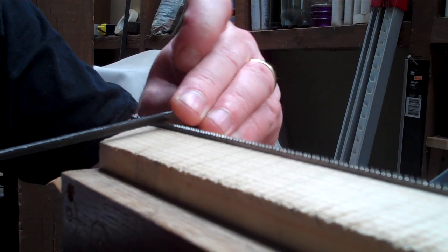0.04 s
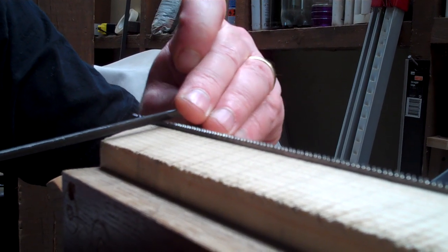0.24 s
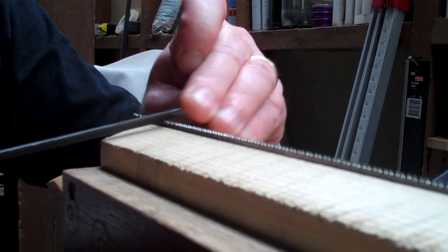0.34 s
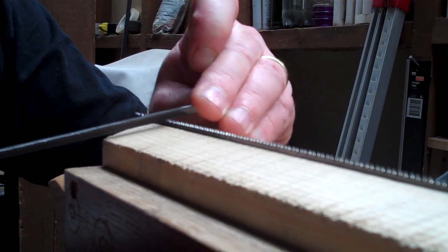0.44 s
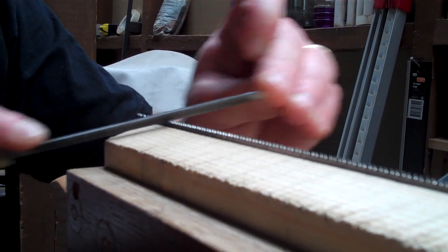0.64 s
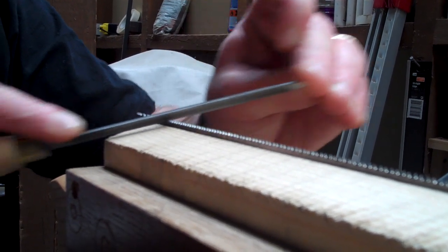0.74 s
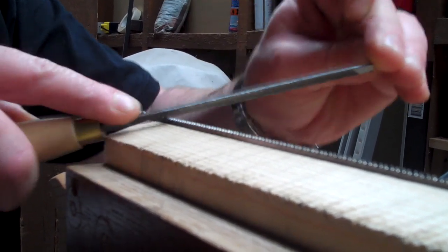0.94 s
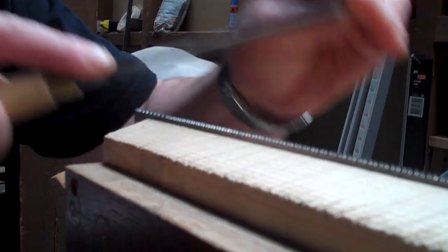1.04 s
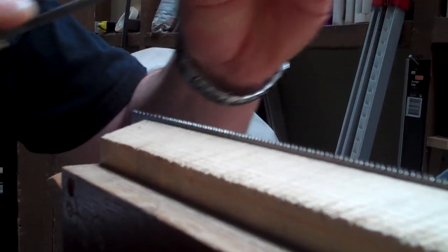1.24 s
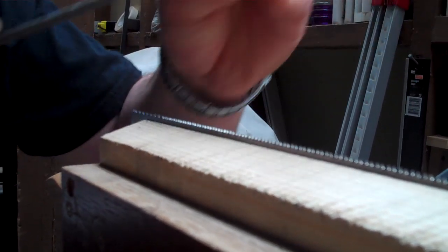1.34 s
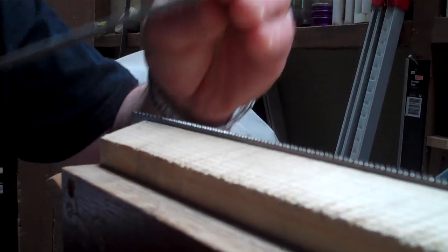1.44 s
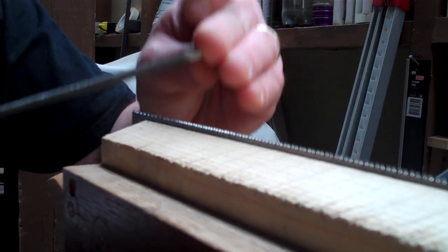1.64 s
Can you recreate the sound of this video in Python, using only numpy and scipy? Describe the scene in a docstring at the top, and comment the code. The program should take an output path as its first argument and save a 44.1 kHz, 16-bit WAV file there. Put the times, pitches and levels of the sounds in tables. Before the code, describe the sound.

Metal file scraping on a saw blade: light taps, two raspy pushes, a tick, then quiet

```python
"""A steel file rasps in a tooth gap of a handsaw clamped between boards, in a quiet workshop, microphone close by.
It taps down, makes a short and a long push, and is lifted off. Random catches over smooth noise make the rasp,
short blows the taps and snags; both drive resonances of boards, blade and file. The lifted file ticks,
the bench rumbles, the sleeve rustles as the arm draws back; the walls answer briefly over a steady hush."""
import sys
import numpy as np
from scipy import signal
from scipy.fft import rfft, irfft, next_fast_len
from scipy.io import wavfile
from scipy.ndimage import uniform_filter1d, map_coordinates

SR = 44100
rng = np.random.default_rng(int(sys.argv[2]) if len(sys.argv) > 2 else 0)


def inscribe(sig):
    """Save sig as 16-bit PCM at rate SR to the path in sys.argv[1].

    A 1-D sig is mono; a 2-D sig holds one channel per row.
    Samples are clipped to [-1, 1] before scaling.
    """
    pcm = np.round(np.clip(np.atleast_2d(sig).T, -1, 1) * 32767)
    wavfile.write(sys.argv[1], SR, pcm.astype(np.int16))


N = 74970

# The hush of the shop and the microphone. Each row: frequency in Hz, relative density in dB per Hz.
AIR_SPECTRUM = [(15, -13.5), (45, -3), (150, -9.5), (450, -13), (1500, -16), (4500, -16.5), (7000, -22),
                (10000, -28.5), (13000, -45.5), (14500, -69.5)]
# How alike left and right are in the hush. Each row: frequency in Hz, likeness (1 = same).
AIR_LIKENESS = [(60, 0.33), (240, 0.8), (950, 0.21), (3770, 0.069), (15000, 0.03)]
# The file is set down. Each row: start in seconds, relative levels in dB of the blow on the boards,
# the blade's low ring, its high ring and the treble, then rise in seconds, time to fall 20 dB in seconds.
TAPS = [(0.157, 2, -4.5, -10, -11.5, 0.0013, 0.0044), (.1625, -6.5, 1, -15, -13.5, 0.00062, 0.0042),
        (0.1662, -10, -15.5, -5, -9.5, 0.00036, 0.006), (0.179, 0.5, -22.5, -10.5, -17, 0.00044, 0.0059),
        (0.203, -3.5, -14, -9.5, -11.5, .0005, 0.006), (0.2071, -1, -0.5, -7, -11.5, 0.00029, 0.0016),
        (0.3251, 4.5, 11.5, 7.5, 0, .0014, 0.0033), (0.4235, 8, 0, -6, -2, .0006, .004),
        (0.429, 9, 9, -9.5, -15.5, .001, 0.0034)]
# The clamping boards. Each row: resonance in Hz, width in Hz, relative level in dB,
# left minus right in dB, radians that the left leads.
BOARD_MODES = [(163.4, 45, -19, -3, 0), (232, 40, -21.5, -0.5, 0), (269.9, 67, -10.5, -2.5, -0.27),
               (362.4, 39, -6, 1.5, -.3), (388.8, 46, -2, -2.5, -.35), (457.4, 51.7, -1, -4, -0.052),
               (529, 60, -6, -1.5, -0.26), (603, 101, -7, -3, 0), (812, 41, -16.5, 8.5, -0.18),
               (837, 29, -18, -5, 0.069)]
# The blade's low ring. Each row: resonance in Hz, width in Hz, level in dB, left minus right in dB, left lead in radians.
BLADE_LOW_MODES = [(1064, 120, -10, -0.5, -0.11), (1138, 130, -6.5, -5, -.3), (1329, 66, 1.5, -3, 0.75),
                   (1396, 110, -4.5, -8, -.6), (1535, 45, -3.5, -5, -1.4), (1517, 70, -9, 2.5, -.4),
                   (1708, 80, -4, -2, 0.91), (1846, 70, -10, 3, 0.66), (2118, 250, -10.5, -2.5, -1)]
# The blade's high ring. Each row: resonance in Hz, width in Hz, level in dB, left minus right in dB, left lead in radians.
BLADE_HIGH_MODES = [(2418, 160, -14.5, -0.5, -0.71), (2703, 63.4, 2, -1.5, -0.91),
                    (2933, 190, -5.5, -5, -0.95), (3207, 50, -4, -0.5, 1)]
# The file itself. Each row: resonance in Hz, width in Hz, level in dB, left minus right in dB, left lead in radians.
FILE_MODES = [(3600, 470, -1.5, -3, -0.22), (4473, 198, 3.5, -0.5, 2.15), (4860, 130, -1, -13, 0.5),
              (5325, 190, 1, -15.5, 0), (6127, 320, 3.5, -4, 2), (6820, 140, -5.5, 3, 0.2)]
# The file's top hiss. Each row: resonance in Hz, width in Hz, level in dB, left minus right in dB, left lead in radians.
HISS_MODES = [(7850, 580, 2.5, -9, 4), (8870, 780, -4.5, -12, -0.5), (11000, 710, -10, -10.5, 1.5),
              (12800, 1500, -18, -0.5, -1)]
# How alike left and right are close to the work. Each row: frequency in Hz, likeness (1 = same).
NEAR_LIKENESS = [(100, 1), (450, 0.98), (1200, 1), (2600, 1), (4500, .5), (6200, 0.55), (9500, 0.42),
                 (12500, 0.46)]
# Decay of the walls' answer. Each row: frequency in Hz, time to fall 60 dB in seconds.
ROOM_DECAY = [(200, .4), (1200, 0.29), (5000, 0.15), (12000, 0.18)]
# Low rumble through the bench. Each row: time in seconds, level in dB.
BENCH_LEVEL = [(0.4, -86), (0.432, -48), (0.484, -59), (0.518, -65.5), (0.678, -49), (0.696, -53.5),
               (0.858, -39), (1.008, -52.5), (1.034, -60), (1.2, -70)]
# The bench. Each row: resonance in Hz, width in Hz, level in dB, left minus right in dB, left lead in radians.
BENCH_MODES = [(60, 40, 0, -1, 0), (105, 50, -2, -6.5, 0)]
# The short and the long push, a list of rows each. Each row: time in seconds, levels in dB of the boards,
# the blade's low ring, its high ring, the file's ring and the top hiss.
PUSHES = [
    [(0.428, -17, -21, -20.5, -33.5, -36), (0.434, -4.5, -33.5, -16, -31.5, -42.5),
     (0.44, -20, -28, -32.5, -35, -47), (0.454, -16, -21, -26, -26.5, -42),
     (0.488, -25, -27, -42, -35, -49.5)],
    [(0.579, -18.5, -21.5, -30, -30.5, -47), (0.597, -19, -24, -28.5, -39, -44),
     (0.607, -23, -21, -29, -29.5, -42), (0.639, -23, -24.5, -32.5, -27, -42),
     (0.649, -17, -31.5, -33.5, -33.5, -45.5), (0.663, -20, -23.5, -32, -28.5, -44),
     (0.707, -16, -22, -27, -23, -41), (0.721, -27, -25, -30.5, -26.5, -41),
     (0.733, -15, -26.5, -21, -27, -42.5), (0.741, -24.5, -22, -36, -32, -44),
     (0.781, -24.5, -19, -25, -30.5, -38), (0.791, -20, -27, -31, -31, -39),
     (0.801, -17.5, -23.5, -29.5, -30, -39), (0.835, -22.5, -30, -32, -32, -44),
     (0.845, -17.5, -20.5, -34, -29.5, -42.5), (0.911, -22.5, -18, -30, -26, -39.5),
     (0.949, -24, -24.5, -22.5, -31, -42.5), (0.959, -19.5, -22.5, -24, -28, -43),
     (0.985, -25.5, -33.5, -31.5, -33.5, -45.5)],
]
# A cut of the file snags and lets go. Each row: start in seconds, relative levels in dB of the blow
# on the boards, the blade's low ring, its high ring and the treble.
SNAGS = [(.439, 14, -8.5, -18, -19.5), (0.4456, 4, 5.5, -11, -22), (.467, 0.5, 1.5, -12.5, -21.5),
         (.484, -1, -6.5, -34, -18.5), (.586, 10.5, 2, -11.5, -16.5), (.598, -3, -7, -13, -10.5),
         (.653, 3.5, 0, -25, -10.5), (.698, 8, -1, -6, -9), (.709, -7, -5, -1.5, -9.5),
         (.730, 6, 5.5, 1, -12), (.790, 0.5, 3.5, 3, -18), (0.8509, 3.5, 2, -11, -10),
         (0.912, 1, 3, -5, -15), (0.935, -13, -16.5, 2, -19.5), (0.982, -4, 2, -10.5, -4.5)]
# Soft ticks after the lift. Each row: start in seconds, level in dB, rise in seconds,
# time to fall 20 dB in seconds, tilt toward the treble in dB per octave.
TICKS = [(1.051, -7, 0.01, .007, 0), (1.084, -32, 0.0071, 0.0065, 6), (1.421, -40, 0.0033, 0.0079, 5)]
# The lifted file. Each row: resonance in Hz, width in Hz, level in dB, left minus right in dB, left lead in radians.
LOOSE_FILE_MODES = [(487, 300, -9.5, -10.5, 0.0026), (1765, 163, 2.5, -8, 0.0061),
                    (2670, 280, -3, -8, 0.0015), (3640, 395, -8, -5.5, 0.0021), (4650, 315, 0, -7, 0.003),
                    (5350, 300, -18.5, -12, 0.0019), (7000, 730, -27, -15, 0)]
# The sliding sleeve. Each row: time in seconds, level in dB.
SLEEVE_LEVEL = [(1.061, -57), (1.11, -59), (1.279, -62.5), (1.34, -74)]
# The cloth. Each row: resonance in Hz, width in Hz, level in dB, left minus right in dB, left lead in radians.
CLOTH_MODES = [(989, 160, -6, -4.5, 0.012), (2800, 330, -11, -3.5, 0.0073), (4300, 440, -8.5, -2, 0.0067),
               (6200, 500, -14, -9.5, 0.0084)]
# The right microphone port loses the top treble. Each row: frequency in Hz, left minus right in dB.
PORT_BALANCE = [(9500, 0), (11500, 9)]

AIR_DB, ROOM_DB = -61.5, -10.5
BLOW = 3.8  # height of a blow's impulse over its scratch of noise
SNAG_RISE_S, SNAG_FALL_S = 0.00016, 0.001
WALL_DELAY_S, WALL_SPREAD_RAD = 0.0046, 0.22  # first answer, left-right spread
SHIFT_S = 0.07  # overlapping random tails, renewed this often, keep the walls' answer smooth and untonal
CATCHES_PER_S, CATCH_SCATTER_DB, SMOOTH_SHARE = 1200, 3.5, 0.59  # share of smooth scraping in the power
BITE_S, LIFT_S = 0.005, 0.004  # fade-in of a push, time constant of its end
WANDER_PER_S, WANDER_DB = 50, 3.5  # each resonance swells on its own as the contact moves
STEADY_SHARE, STEADY_S = 0.68, 0.016  # share of the random swells of the ring evened out, over this time
THIN_HZ, DULL_HZ = 200, 7230  # boards, blade and file ring radiate little below and above
HISS_UNDER_DB = -17  # a contact's top hiss under its treble
LOW_CUT_HZ, ROLL_HZ, TOP_HZ = 23.8, 14100, 16600  # bass roll-off, treble fade, upper limit of the sound


def amp(db):
    """Amplitude of a level in dB."""
    return 10 ** (np.asarray(db) / 20)


def unit(x):
    """x scaled to an rms of 1."""
    return x / np.sqrt(np.mean(x ** 2) + 1e-20)


def along(points, hz):
    """Interpolates (Hz, value) points on a log frequency axis."""
    f, v = np.transpose(points)
    return np.interp(np.log(hz + 1), np.log(f + 1), v)


def level_between(points):
    """Interpolates (seconds, dB) points over time, practically silent outside them."""
    s, db = np.transpose(points)
    return np.interp(np.arange(N) / SR, s, db, left=-120, right=-120)


def wobble(rate):
    """A smooth random curve, rate knots a second."""
    knots = rng.standard_normal(int(N * rate / SR) + 4)
    return map_coordinates(knots, [np.arange(N) * rate / SR])


def filtered(x, response):
    """x times a complex response of frequency."""
    m = next_fast_len(N + SR // 2)
    spectrum = rfft(x, m) * response(np.fft.rfftfreq(m, 1 / SR))
    return irfft(spectrum, m)[..., :N]


def paired(two, likeness):
    """Two unrelated signals mixed to left and right of the given likeness."""
    def mid_side(hz):
        turn = np.arccos(np.clip(along(likeness, hz), -1, 1)) / 2
        return np.array([np.cos(turn), np.sin(turn)])

    mid, side = filtered(two, mid_side)
    return np.array([mid + side, mid - side])


def resonance(hz, center, width):
    """Response of one damped resonance, 1 at its center."""
    return 1j * hz * width / (center * center - hz * hz + 1j * hz * width)


def ring(force, modes, wander_db):
    """A stereo force excites parallel resonances, scaled together to keep the level of white noise."""
    grid = np.linspace(0, SR / 2, 4000)
    power = sum(amp(db) ** 2 * abs(resonance(grid, c, w)) ** 2 for c, w, db, *_ in modes)
    norm = np.sqrt(np.mean(power))
    out = 0
    for k, (center, width, db, pan, lead) in enumerate(modes):
        ports = amp([[db + pan / 2], [db - pan / 2]]) * np.exp([[.5j * lead], [-.5j * lead]])
        drive = force * amp(wander_db * wobble(WANDER_PER_S))
        # neighbours alternate in sign
        out = out + (-1) ** k * filtered(drive, lambda hz: ports * resonance(hz, center, width) / norm)
    return out


def air():
    """Shaped noise is the steady hush of the shop and the microphone, slightly stronger on the right."""
    noise = paired(rng.standard_normal((2, N)), AIR_LIKENESS)
    hush = filtered(noise, lambda hz: amp(along(AIR_SPECTRUM, hz)))
    return amp(AIR_DB) * unit(hush) * amp([[-.7], [.7]])


def contact(rise, fall):
    """A blow with a short scratch of noise, scaled so that its first channel has energy 1."""
    t = np.arange(SR // 20) / SR
    envelope = np.where(t < rise, (t / rise) ** 2, amp(-20 * (t - rise) / fall))
    scratch = rng.standard_normal((2, len(t))) * envelope
    scratch[0, round(rise * SR)] = BLOW
    return scratch / np.linalg.norm(scratch[0])


def taps():
    """Blows of the file set down and of snagging cuts push on each of the four bodies."""
    forces = np.zeros((4, 2, N + SR))
    snags = [(*row, SNAG_RISE_S, SNAG_FALL_S) for row in SNAGS]
    for s, *levels, rise, fall in list(TAPS) + snags:
        hit = contact(rise, fall)
        start = round(s * SR)
        forces[:, :, start:start + hit.shape[1]] += amp(levels)[:, None, None] * hit
    return [paired(force[:, :N], NEAR_LIKENESS) for force in forces]


def room(x):
    """Each frequency of the walls' answer dies at its own speed; overlapping random tails keep it untonal."""
    out, step = np.zeros((2, N + SR)), round(SHIFT_S * SR)
    c, s = np.cos(WALL_SPREAD_RAD), np.sin(WALL_SPREAD_RAD)
    spread = np.array([[c, s], [c, -s]])
    for start in range(0, N, step):
        hz, t, z = signal.stft(rng.standard_normal((2, SR // 2)), SR, nperseg=256)
        decay = amp(-60 * t / along(ROOM_DECAY, hz)[:, None])
        tail = spread @ signal.istft(z * decay, SR, nperseg=256)[1]
        tail = tail / np.linalg.norm(tail[0])
        # overlapping windows crossfade one tail into the next
        piece = x.mean(0)[start:start + 2 * step]
        piece = piece * np.hanning(2 * step)[:len(piece)]
        answer = signal.fftconvolve(piece[None], tail, axes=1)
        out[:, start + round(WALL_DELAY_S * SR):][:, :answer.shape[1]] += answer
    return out[:, :N]


def bench():
    """The pushes shake the bench under the microphone: noise through two low resonances."""
    noise = paired(rng.standard_normal((2, N)), NEAR_LIKENESS)
    return ring(amp(level_between(BENCH_LEVEL)) * noise, BENCH_MODES, wander_db=2)


def rasp():
    """The cuts of the file catch at random moments, over the smooth hiss of scraping."""
    caught = rng.random(N) < CATCHES_PER_S / SR
    sizes = amp(CATCH_SCATTER_DB * rng.standard_normal(N))
    catches = unit(caught * sizes * rng.standard_normal((2, N)))
    smooth = rng.standard_normal((2, N))
    two = np.sqrt(1 - SMOOTH_SHARE) * catches + np.sqrt(SMOOTH_SHARE) * smooth
    return paired(two, NEAR_LIKENESS)


def pushes():
    """Each push bites quickly, varies along its stroke and stops as the file lifts: gains for each body."""
    t, gains = np.arange(N) / SR, 0
    for rows in PUSHES:
        s, *levels = np.transpose(rows)
        bite = np.clip(1 + (t - s[0]) / BITE_S, 0, 1)
        lift = np.exp(-np.clip(t - s[-1], 0, None) / LIFT_S)
        gains = gains + bite * lift * amp([np.interp(t, s, db) for db in levels])
    return gains


def radiation(hz):
    """Thins the bass and dulls the treble of the ringing bodies."""
    x = hz / DULL_HZ
    return 1j * hz / (THIN_HZ + 1j * hz) / (1 - x ** 2 + np.sqrt(2) * 1j * x) ** 2


def saw():
    """Rasp, taps and snags sound through the resonances of boards, blade and file."""
    force, hits, out = rasp(), taps(), 0
    *gains, top_gain = pushes()
    bodies = [BOARD_MODES, BLADE_LOW_MODES, BLADE_HIGH_MODES, FILE_MODES]
    for gain, hit, modes in zip(gains, hits, bodies):
        swell = uniform_filter1d((ring(force, modes, 0) ** 2).mean(0), round(STEADY_S * SR))
        steadied = gain * force / np.abs(swell) ** (STEADY_SHARE / 2)
        out = out + ring(steadied, modes, WANDER_DB) + ring(hit, modes, 0)
    hiss = top_gain * force + amp(HISS_UNDER_DB) * hits[-1]
    return filtered(out, radiation) + ring(hiss, HISS_MODES, 0)


def ticks():
    """The lifted file brushes a tooth, then clicks faintly in the hand, ringing freely."""
    out = 0
    for s, db, rise, fall, tilt_db in TICKS:
        blow = amp(db) * contact(rise, fall)
        force = np.pad(blow, ((0, 0), (round(s * SR), N)))[:, :N]
        tilted = [(c, w, level + tilt_db * np.log2(c / 4500), *rest) for c, w, level, *rest in LOOSE_FILE_MODES]
        out = out + ring(paired(force, NEAR_LIKENESS), tilted, 0)
    return out


def sleeve():
    """Cloth slides as the arm draws back: noise of unsteady level through broad resonances."""
    level = level_between(SLEEVE_LEVEL) + 2 * wobble(20)
    noise = paired(rng.standard_normal((2, N)), NEAR_LIKENESS)
    return ring(amp(level) * noise, CLOTH_MODES, wander_db=1.5)


def scene():
    """File and saw close by with the walls' answer, then bench, sleeve and hush added dry."""
    near = saw() + ticks()
    return near + amp(ROOM_DB) * room(near) + bench() + sleeve() + air()


def record(dry):
    """Rolls off the bass, fades the top treble and ends it at TOP_HZ, with less top treble on the right."""
    def response(hz):
        bass = (1j * hz / (LOW_CUT_HZ + 1j * hz)) ** 2
        ports = amp(np.outer([.5, -.5], along(PORT_BALANCE, hz)))
        treble = (hz < TOP_HZ) / (1 + (hz / ROLL_HZ) ** 24)
        return bass * ports * treble

    return filtered(dry, response)


dry = scene()
out = record(dry)
inscribe(out)
```